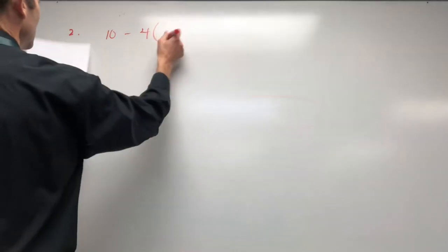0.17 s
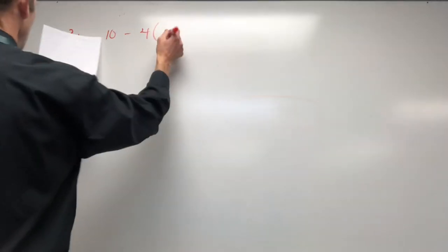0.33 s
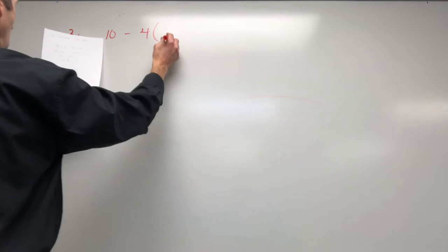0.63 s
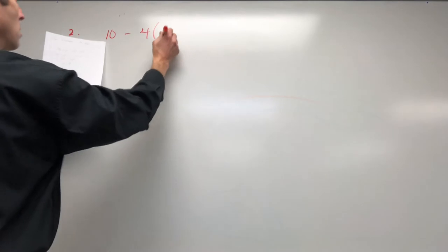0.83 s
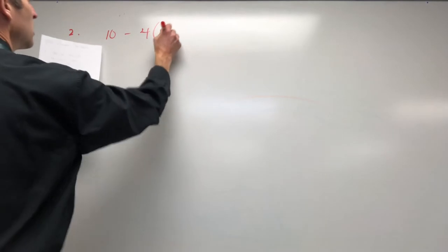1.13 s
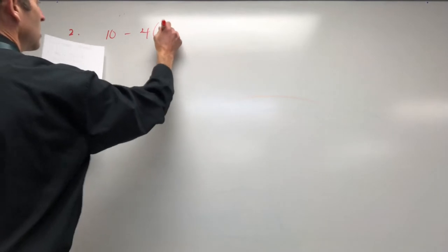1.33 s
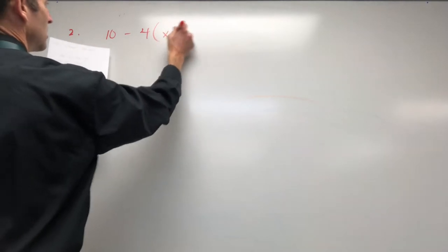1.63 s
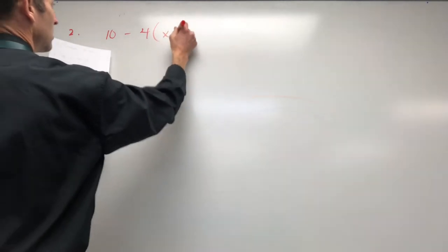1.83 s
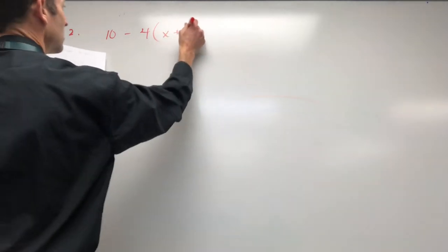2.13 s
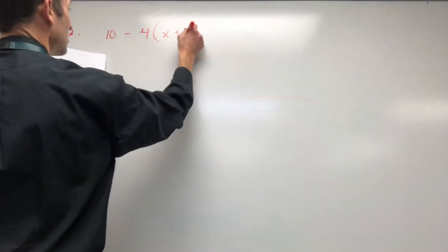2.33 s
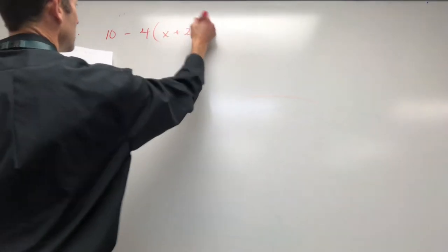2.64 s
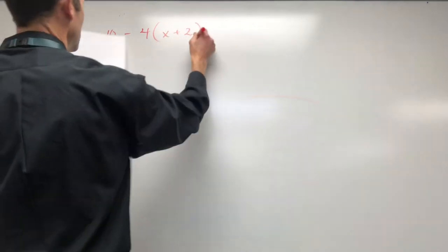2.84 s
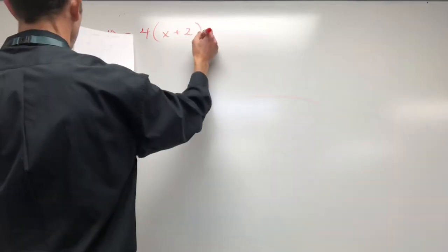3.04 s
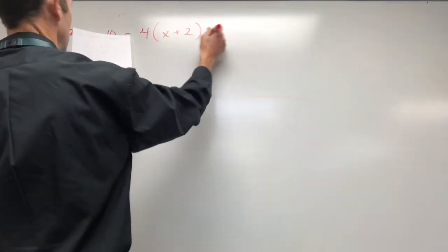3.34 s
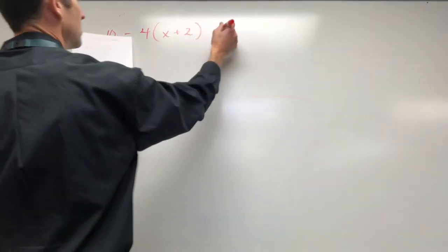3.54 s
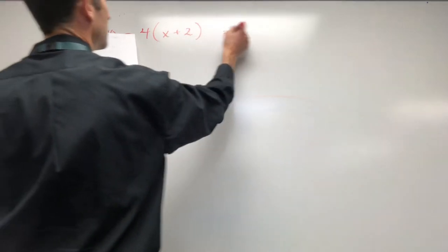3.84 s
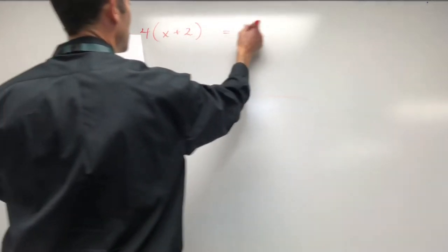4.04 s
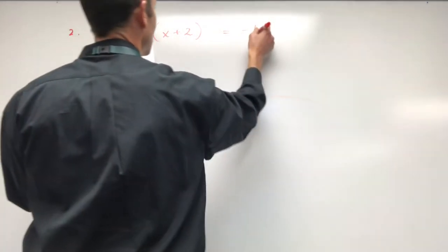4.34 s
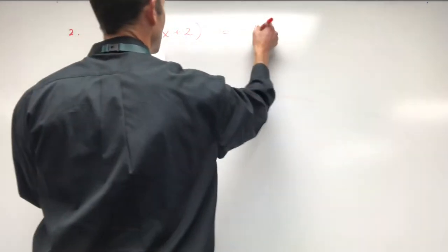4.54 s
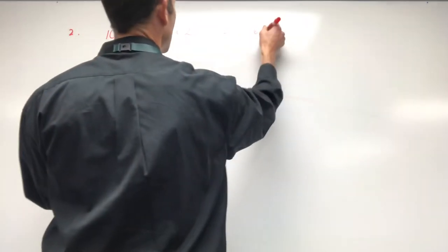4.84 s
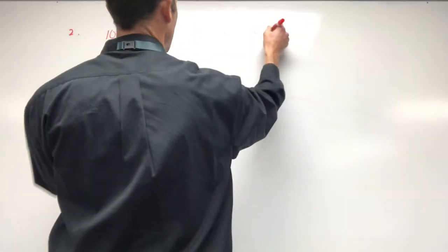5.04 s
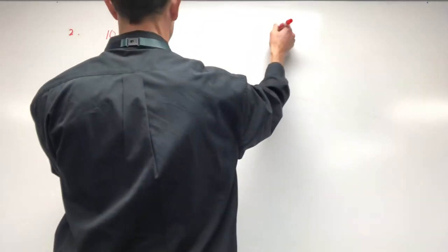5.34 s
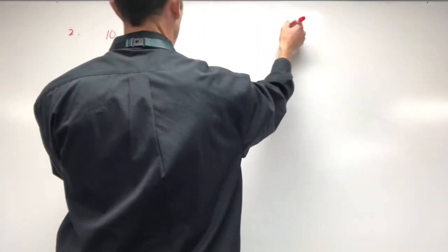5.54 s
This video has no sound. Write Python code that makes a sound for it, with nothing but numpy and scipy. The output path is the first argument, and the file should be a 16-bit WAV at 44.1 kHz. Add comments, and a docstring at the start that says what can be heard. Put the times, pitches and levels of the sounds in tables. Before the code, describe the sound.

In a quiet classroom, a marker writes on a wall-mounted whiteboard. A faint felt hiss, a rustle of sleeve and paper and a small cap click come first. Then the nib lands in quick, irregular taps, each a hollow thump on the panel, with soft hissing strokes between. The barrel clicks, the writing pauses briefly, and more taps follow. The microphone picks up short room echoes and a steady low ventilation murmur.

```python
"""A brief hiss of felt and a rustle of sleeve and paper, over murmuring ventilation in a quiet classroom.
A marker is writing a short equation on a wall-mounted whiteboard: each landing of the nib knocks and
thumps the panel, then the felt catches and slips through its stroke. The plastic cap clicks as the
grip shifts, and later the barrel clicks too. Three echoes and a short room tail follow the thumps."""
import sys
import numpy as np
from scipy import signal
from scipy.fft import rfft, irfft
from scipy.io import wavfile

SR = 44100
rng = np.random.default_rng(int(sys.argv[2]) if len(sys.argv) > 2 else 0)


def put_to_file(sound):
    """Save the sound as 16-bit audio at rate SR, in the file named by the first command-line argument."""
    columns = np.atleast_2d(sound).T  # one column per channel
    safe = np.clip(columns, -1, 1)
    whole_steps = np.round(safe * 32767)
    wavfile.write(sys.argv[1], SR, whole_steps.astype(np.int16))


N = 250620
TIME = np.arange(N) / SR

# ventilation spectrum: f/Hz, relative level/dB
AIR_SPECTRUM = [(15, -42), (25, -15.5), (59, -5), (108, -8.5), (130, -10.5), (206, -17.5), (285, -20),
                (363, -14), (416, -19), (714, -22), (863, -23), (2280, -31.5), (2690, -30.5), (7510, -35),
                (16000, -45)]
# marker strokes: t/s, length/s, level at full speed/dB, tilt/(dB per octave)
STROKE_CUES = [(-.03, 0.092, -66.5, 1.5), (1.024, 0.11, -67.5, -1), (1.283, .1, -65.5, -2),
               (1.739, 0.079, -67.5, -2.5), (2.055, .165, -66.5, -.5), (2.251, 0.11, -69, -2.5),
               (2.574, .18, -63.5, -2.5), (4.164, 0.14, -66.5, -2), (4.309, 0.091, -67, -2.5),
               (4.403, 0.065, -69.5, -2.5), (4.642, .12, -68, -1.5), (4.879, 0.1, -67.5, -3.5),
               (5.615, 0.081, -74, 0)]
# felt rubbing on the glossy board: f/Hz, relative level/dB
FELT_SPECTRUM = [(800, -3.5), (2000, -3), (3300, -3.5), (4400, 1), (5500, -0.5), (6400, 1.5), (8200, -5.5),
                 (11500, -11), (13500, -9), (16000, -28)]
# paper and sleeve movements: t/s, length/s, level at full speed/dB
RUSTLE_CUES = [(-.02, 0.097, -60.5), (0.053, .11, -60.5), (0.174, 0.085, -67.5), (.265, 0.094, -58.5),
               (0.474, 0.1, -64.5), (0.725, 0.095, -66.5), (2.834, 0.098, -64.5), (2.988, 0.066, -57),
               (3.225, 0.059, -62), (4.265, 0.078, -64.5)]
# their hiss: f/Hz, relative level/dB
RUSTLE_SPECTRUM = [(100, -4.5), (400, -5), (1100, -5.5), (1700, -8), (2600, -15), (4500, -19.5),
                   (8000, -29), (15000, -52)]
# classroom decay: f/Hz, t60/s
ROOM_DECAY = [(120, 1), (300, 0.66), (600, 0.67), (1500, 0.26), (5000, 0.28), (12000, 0.14)]
# the nib lands on the board: t/s, thump drive level/dB, contact time/ms
LANDING_CUES = [(.334, -44.5, 1.9), (1.018, -26, 2.35), (1.273, -22.5, 2.31), (1.557, -20.5, 1.78),
                (1.737, -22.5, 2.1), (2.028, -24, 2.17), (2.536, -49, 1.25), (2.571, -24, 1.34),
                (3.566, -21, 1.71), (3.723, -20, 1.43), (3.95, -39, 1.4), (3.966, -18, 1.32),
                (4.158, -22.5, 2), (4.633, -22.5, 2.02), (4.866, -22.5, 1.79), (5.605, -22, 1.45)]
# the nib's knock: f/Hz, relative level/dB
KNOCK_SPECTRUM = [(400, -22), (850, 4.5), (1100, 0.5), (1300, -5), (1700, -11.5), (2400, -19),
                  (4500, -21.5), (8000, -30.5), (15000, -42)]
# bending modes of the panel: f/Hz, relative level/dB, t60/s
PANEL_MODES = [(164.1, -21, 0.27), (192.7, -27.5, 0.2), (269.7, -8.5, 0.14), (332.3, -7, 0.073),
               (352.4, -6, 0.096), (428.6, -13, 0.19), (467.1, -11.5, 0.16), (486.4, -9, 0.071),
               (553.3, -10, 0.094), (600, -56, 0.021), (693, -21.5, 0.2)]
# echoes off the writer's body, a side wall and the far wall: delay/s, level/dB, low cut f/Hz
ECHO_PATHS = [(.0072, -8, 530), (0.0269, -11, 136), (.074, -15, 367)]
# the cap shifts on the barrel in three quick slips: t/s, level/dB
CAP_CUES = [(.3762, -48.5), (.3783, -37.5), (.3809, -49)]
# ring of the cap: f/Hz, relative level/dB, t60/s
CAP_MODES = [(1050, -11, 0.029), (1377, -3.5, 0.021), (1800, -5.5, 0.012), (2670, -26, 0.01),
             (3390, -12.5, 0.013), (3610, -12, 0.04), (4600, -27, 0.014), (5060, -13.5, 0.037),
             (5740, -13, 0.019), (6800, -23, 0.016), (8000, -22, 0.016)]
# the crack of hard plastic: f/Hz, relative level/dB
CRACK_SPECTRUM = [(300, -36), (1100, -25), (2300, 7), (3500, 8), (5500, -0.5), (8300, -1), (10500, -17),
                  (13000, -36)]
# the barrel clicks: t/s, level/dB
BARREL_CUES = [(2.204, -56.5), (2.2112, -62), (2.2508, -46.5)]
# ring of the barrel: f/Hz, relative level/dB, t60/s
BARREL_MODES = [(1055, 1, 0.012), (1310, 3.5, 0.028), (1580, -13, 0.061), (3470, -14, 0.025),
                (4470, -8, 0.018)]

FELT_RELEASE_S = 0.044  # strokes and skids all brake alike


def from_db(db):
    """Decibels to gain."""
    return 10 ** (np.asarray(db) / 20)


def rms_one(x):
    """Scale to unit rms."""
    return x / np.sqrt(np.mean(x ** 2) + 1e-20)


def at_hz(points, hz):
    """Read a table along a log-frequency axis."""
    table = np.array(points)
    return np.interp(np.log(np.maximum(hz, 1)), np.log(table[:, 0]), table[:, 1])


def coloured(x, spectrum, tilt_db=0):
    """EQ a signal to a spectrum, tilted per octave; rms 1."""
    hz = np.maximum(np.fft.rfftfreq(len(x), 1 / SR), 1)
    gain = from_db(at_hz(spectrum, hz) + tilt_db * np.log2(hz))
    return rms_one(irfft(rfft(x) * gain, len(x)))


def cut(x, hz, kind, order=2):
    """High- or low-pass."""
    return signal.sosfilt(signal.butter(order, hz, kind, fs=SR, output="sos"), x + 1e-18)


def poles(hz, width_hz):
    """Feedback coefficients of one resonance."""
    radius = np.exp(-np.pi * width_hz / SR)
    return [1, -2 * radius * np.cos(2 * np.pi * hz / SR), radius * radius]


def resonate(x, hz, width_hz):
    """Ring a signal through one resonance; rms 1."""
    return rms_one(signal.lfilter([1, 0, -1], poles(hz, width_hz), x))


def add(out, s, sound):
    """Mix a sound in at its cue time."""
    start = int(round(s * SR))
    first, last = max(start, 0), min(start + len(sound), N)
    out[first:last] += sound[first - start:last - start]


def ventilation(air_db=-65.5, hum_db=-69.5):
    """The bed: steady air noise with a wavering low hum."""
    air = coloured(rng.standard_normal(N), AIR_SPECTRUM)
    hum = resonate(rng.standard_normal(N), hz=52, width_hz=8.2)
    return from_db(air_db) * air + from_db(hum_db) * hum


def gesture(length_s, attack_s, release_s):
    """Speed of a hand movement: it swells from rest and dies away."""
    t = TIME[:16384]
    ramp = np.minimum(t / attack_s, (length_s - t) / release_s)
    return np.sin(np.pi / 2 * np.clip(ramp, 0, 1))


def slips(size, per_s, spread_db):
    """Friction grain: tiny stick-slip releases of uneven strength."""
    strength = rng.standard_normal(size) * from_db(spread_db * rng.standard_normal(size))
    return strength * (rng.random(size) < per_s / SR)


def felt_strokes(usual_length_s=0.099, nib_hz=4480, scatter_octaves=0.11, whistle_db=-10):
    """Fibres catch and slip, louder with speed; the nib's faint whistle shifts pitch stroke by stroke."""
    out = np.zeros(N)
    for start, length_s, db, tilt_db in STROKE_CUES:
        attack_s = 0.025 * (length_s / usual_length_s) ** 2.8  # long curves swell far more slowly
        speed = gesture(length_s, attack_s, FELT_RELEASE_S)
        fibres = slips(len(speed), per_s=6000, spread_db=-1.0)
        hiss = coloured(fibres, FELT_SPECTRUM, tilt_db)
        whistle_hz = nib_hz * 2 ** (scatter_octaves * rng.standard_normal())
        whistle = from_db(whistle_db) * resonate(fibres, whistle_hz, width_hz=380)
        add(out, start, from_db(db) * speed * (hiss + whistle))
    return out


def rustles():
    """Paper and sleeve move in grainy puffs, quick to start and slower to fade."""
    out = np.zeros(N)
    for start, length_s, db in RUSTLE_CUES:
        speed = gesture(length_s, attack_s=0.013, release_s=0.068)
        grain = slips(len(speed), per_s=5000, spread_db=-0.5)
        add(out, start, from_db(db) * speed ** 2 * coloured(grain, RUSTLE_SPECTRUM))
    return out


def classroom(x, build_s=0.0092):
    """Diffuse reflections bloom and die away, treble first, in a fresh pattern on every call."""
    t, tail = TIME[:SR], 0
    white, hz = rfft(rng.standard_normal(SR)), np.arange(SR // 2 + 1)
    edges_hz = np.geomspace(40, 20480, 10)
    for low, high in zip(edges_hz, edges_hz[1:]):
        band = irfft(white * (hz >= low) * (hz < high), SR)
        t60 = at_hz(ROOM_DECAY, np.sqrt(low * high))
        tail = tail + band * from_db(-60 * t / t60)
    tail = tail * (1 - np.exp(-(t / build_s) ** 2))
    return signal.fftconvolve(x, tail / np.sqrt(np.sum(tail ** 2)))[:N]


def burst(spectrum, t60):
    """A crack of countless short-lived modes, played as decaying noise."""
    t = TIME[:SR // 2]
    return coloured(rng.standard_normal(len(t)), spectrum) * from_db(-60 * t / t60)


def knock_db(drive_db, contact_ms, usual_knock_db=-56, usual_drive_db=-20, usual_contact_ms=1.8):
    """Harder and shorter landings knock louder."""
    harder_db = 0.55 * (drive_db - usual_drive_db)
    shorter_db = 14 * np.log2(usual_contact_ms / contact_ms)
    return usual_knock_db + harder_db + shorter_db


def ringing(modes, wave, spread_db=1.0):
    """Struck modes; every hit finds them with slightly different strengths."""
    t, out = TIME[:SR // 2], 0
    for hz, db, t60 in modes:
        struck_db = db + spread_db * rng.standard_normal()
        out = out + from_db(struck_db - 60 * t / t60) * wave(2 * np.pi * hz * t)
    return out


def panel_thump(contact_ms, low_cut_hz, thump_top_hz=1200):
    """A half-sine push bends the thin panel, which radiates little deep bass; the thump's top is rolled off."""
    force = np.sin(np.pi * np.minimum(TIME[:256] * 1000 / contact_ms, 1))
    bending = signal.fftconvolve(ringing(PANEL_MODES, np.cos), force / force.sum())
    # long bending waves travel slowest: an allpass holds the bass back
    allpass = poles(hz=155, width_hz=60)
    dispersed = signal.lfilter(allpass[::-1], allpass, bending)
    radiated = cut(dispersed, low_cut_hz, "high")
    return cut(radiated, thump_top_hz, "low")


def nib_landings(bend_lag_s=0.00182, low_cut_hz=80.5, rise_hz_per_s=15):
    """The nib knocks and the panel thumps just after. Returns the direct sound and its room tail."""
    direct, room = np.zeros(N), np.zeros(N)
    for s, db, contact_ms in LANDING_CUES:
        # the thumps lose bass as the hand works its way along the board
        thump = from_db(db) * panel_thump(contact_ms, low_cut_hz + rise_hz_per_s * s)
        knock = from_db(knock_db(db, contact_ms)) * burst(KNOCK_SPECTRUM, t60=0.17)
        add(direct, s, knock)
        add(direct, s + bend_lag_s, thump)
        add(room, s + bend_lag_s, classroom(thump))  # each spot gets its own answer from the room
    return direct, room


def nib_skids(re_knock_db=-22):
    """The felt slides a little as it settles after each landing."""
    out = np.zeros(N)
    speed = gesture(length_s=0.081, attack_s=0.02, release_s=FELT_RELEASE_S)
    for s, db, contact_ms in LANDING_CUES:
        fibres = slips(len(speed), per_s=4300, spread_db=-1.5)
        hiss = coloured(fibres, FELT_SPECTRUM, tilt_db=-0.5)
        add(out, s, from_db(knock_db(db, contact_ms) + re_knock_db) * speed * hiss)
    return out


def echoes(x):
    """Distinct slaps off the writer and the walls, thin in the bass."""
    return sum(from_db(db) * np.interp(TIME - delay_s, TIME, cut(x, low_cut_hz, "high"), left=0)
               for delay_s, db, low_cut_hz in ECHO_PATHS)


def plastic_clicks(cues, modes, crack_db, crack_t60, top_hz):
    """A hard plastic part gives a short crack and rings briefly."""
    out = np.zeros(N)
    for s, db in cues:
        ring = ringing(modes, np.sin)
        crack = from_db(crack_db) * burst(CRACK_SPECTRUM, crack_t60)
        add(out, s, from_db(db) * (ring + crack))
    return cut(out, top_hz, "low", order=10)


def scene(board_send_db=-13, rubbing_send_db=-7, cap_send_db=-10, barrel_send_db=-9):
    """Mono mix of board, marker and paper, each with its send to the room, over the ventilation."""
    board, board_tail = nib_landings()
    rubbing = felt_strokes() + nib_skids() + rustles()
    cap = plastic_clicks(CAP_CUES, CAP_MODES, crack_db=-2.0, crack_t60=0.022, top_hz=10200)
    barrel = plastic_clicks(BARREL_CUES, BARREL_MODES, crack_db=-14, crack_t60=0.099, top_hz=5400)
    click_send = from_db(cap_send_db) * cap + from_db(barrel_send_db) * barrel
    send = from_db(rubbing_send_db) * rubbing + click_send
    room = from_db(board_send_db) * board_tail + classroom(send)
    return (board + rubbing + cap + barrel + echoes(board) + room + ventilation())[None]


def record(dry, low_cut_hz=37, top_hz=15800):
    """A small microphone loses the deep bass; the top is cut steeply."""
    thin = cut(dry, low_cut_hz, "high", order=8)
    return signal.sosfilt(signal.ellip(10, .1, 70, top_hz, fs=SR, output="sos"), thin)


dry = scene()
out = record(dry)
put_to_file(out)
```